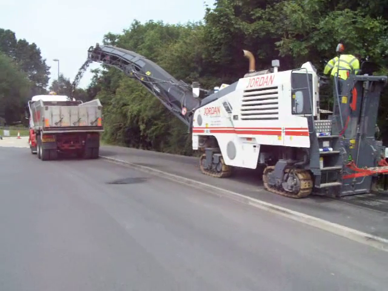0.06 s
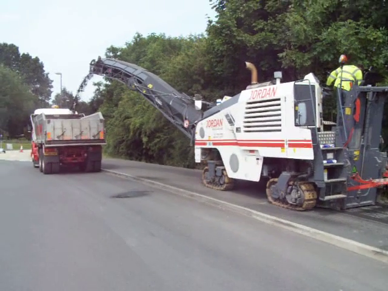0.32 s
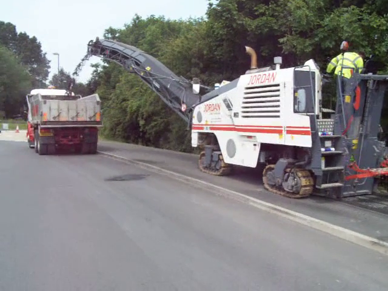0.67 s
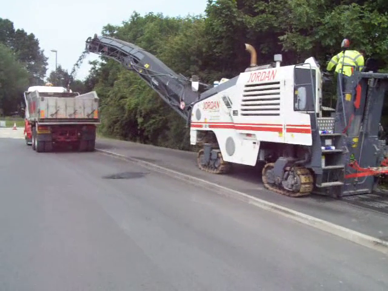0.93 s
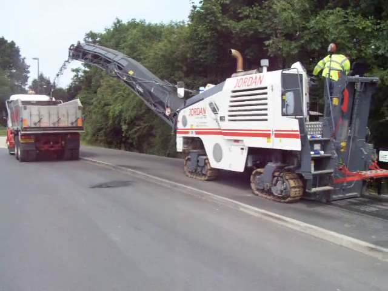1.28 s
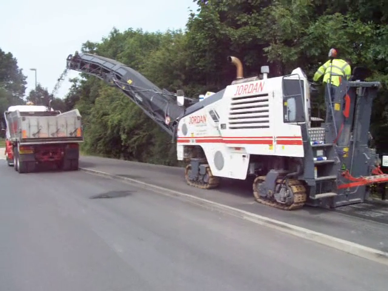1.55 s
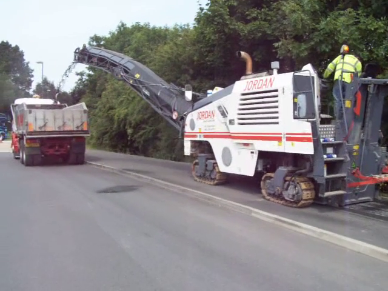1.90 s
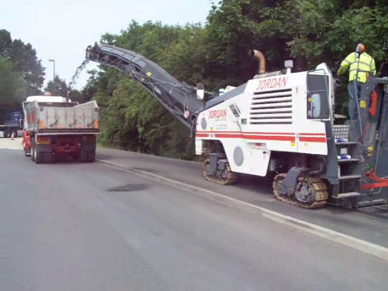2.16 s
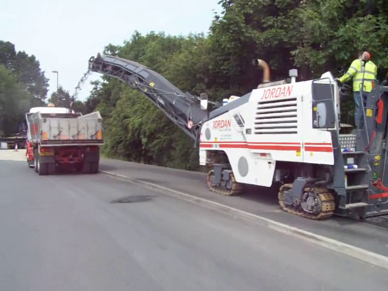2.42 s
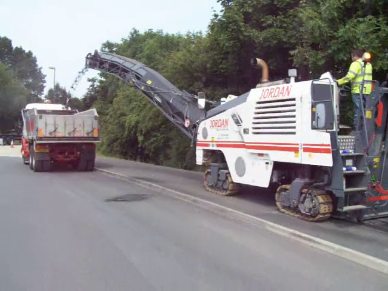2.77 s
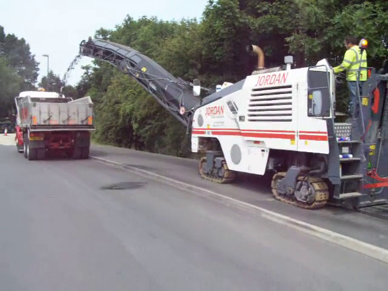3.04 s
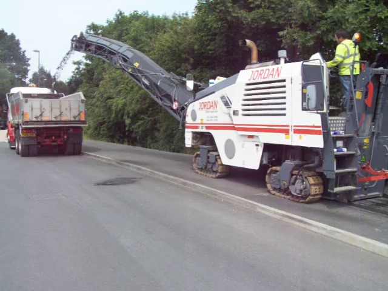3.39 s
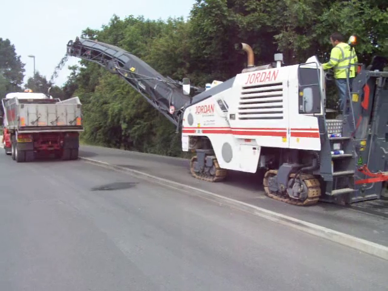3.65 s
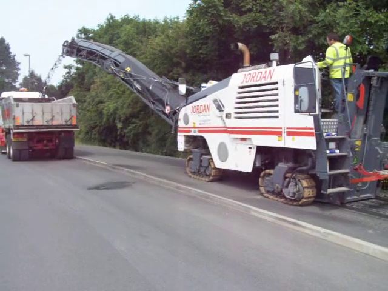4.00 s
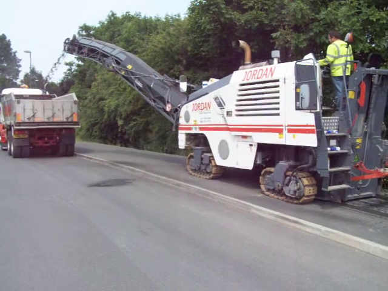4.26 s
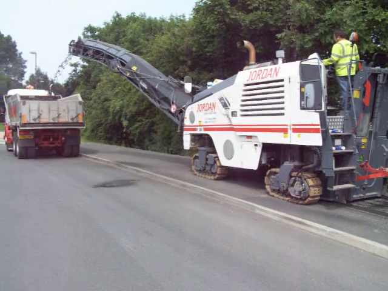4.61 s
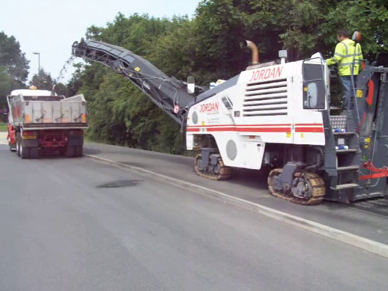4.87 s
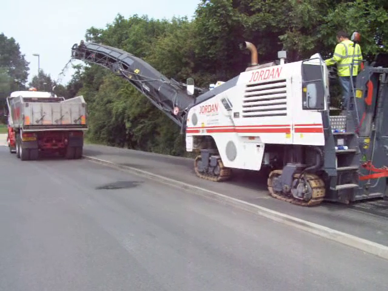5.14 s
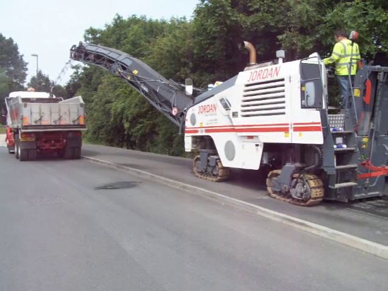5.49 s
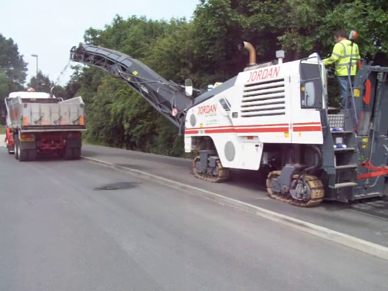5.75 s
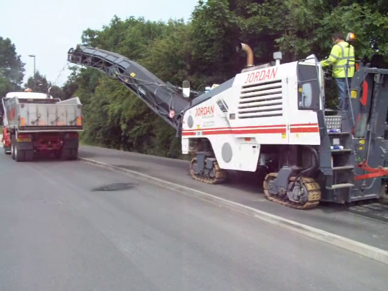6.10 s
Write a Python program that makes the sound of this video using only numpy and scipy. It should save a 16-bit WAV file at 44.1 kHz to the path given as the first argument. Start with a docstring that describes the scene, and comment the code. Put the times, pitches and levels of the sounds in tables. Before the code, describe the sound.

A road planer works about ten metres away in the open air. Its toothed drum bites into asphalt with rapid metallic chatter, pings and brief rough squeals, and a panel booms once. The diesel drone and a gear whine grow with the load as the cut settles into steady crunching, scraping and gritty hiss. Midway the whine turns weaker and rougher, then steadies again.

```python
"""A road planer's toothed drum mills asphalt about ten metres away, in the open air.
Its picks chatter, ping and squeal at first, then settle into steady crunching, scraping and grit hiss.
The six-cylinder diesel drones at governed speed under a gear whine and a pump hum, all growing with
the load. A panel booms once, the frame shudders, and the gears run slack for a spell."""
import sys
import numpy as np
from scipy import signal
from scipy.fft import rfft, irfft
from scipy.io import wavfile
from scipy.ndimage import map_coordinates

SR = 44100
rng = np.random.default_rng(int(sys.argv[2]) if len(sys.argv) > 2 else 0)


def dump(signal):
    """Clip the signal to [-1, 1] and save it as 16-bit WAV at the path in sys.argv[1]."""
    limited = np.clip(np.atleast_2d(signal).T, -1, 1)
    pcm = np.round(limited * 32767).astype(np.int16)
    wavfile.write(sys.argv[1], SR, pcm)


N = 279153
TIME = np.arange(N) / SR
GEAR_TEETH = 24


def undb(db):
    """Decibels to gain."""
    return 10 ** (np.asarray(db) / 20)


def unit(x):
    """Scale to rms 1."""
    return x / np.sqrt(np.mean(x ** 2))


def colour(x, points, skirt_db_per_oct=36):
    """Filter x by (f/Hz, level/dB) points, rolling off outside them; rms 1."""
    hz, db = np.transpose(points)
    octave = np.log2(np.maximum(np.arange(len(x) // 2 + 1) * SR / len(x), 1))
    outside = np.abs(octave - np.clip(octave, np.log2(hz[0]), np.log2(hz[-1])))
    gain = undb(np.interp(octave, np.log2(hz), db) - skirt_db_per_oct * outside)
    return unit(irfft(rfft(x) * gain, len(x)))


def walk(rate_hz):
    """Smooth random wander, spread about 1."""
    knots = rng.standard_normal(4096)
    coarse = map_coordinates(knots, [TIME[::32] * rate_hz + 2], order=3, mode="wrap")
    return np.interp(TIME, TIME[::32], coarse)


def ramp(start_s, length_s):
    """Linear rise from 0 to 1, then held."""
    return np.clip((TIME - start_s) / length_s, 0, 1)


def swell(middle_s, length_s):
    """Half-cosine arch of height 1."""
    return np.cos(np.pi * np.clip((TIME - middle_s) / length_s, -0.5, 0.5))


def add(track, start_s, sound):
    """Mix a short sound into a track."""
    i = max(int(start_s * SR), 0)
    track[i:i + len(sound)] += sound[:N - i]


def load_db(idle_db, full_db, ease_db=0, curve=1.5):
    """Level curve: load builds as the drum sinks in; later the cut eases."""
    load = 1 - (1 - ramp(0, length_s=1.77)) ** curve
    return idle_db + (full_db - idle_db) * load + ease_db * ramp(start_s=3.8, length_s=0.38)


def tones(turns, orders, waver_db, flutter_rad, spread_cycles=1):
    """Shaft-locked wavering tones, rms 1; a small phase spread lines them up into a knock."""
    out = 0
    for order, db in orders:
        phase = 2 * np.pi * (order * turns + spread_cycles * rng.random()) + flutter_rad * walk(9)
        out = out + undb(db + waver_db * walk(6)) * np.sin(phase)
    return unit(out)


def clatter(turns, repeat_share):
    """Noise, part of which repeats every two crank turns."""
    cycle = rng.standard_normal(2400)
    looped = map_coordinates(cycle, [turns / 2 % 1 * len(cycle)], order=3, mode="grid-wrap")
    return np.sqrt(repeat_share) * unit(looped) + np.sqrt(1 - repeat_share) * rng.standard_normal(N)


def stones(rate_hz, scatter_db):
    """Dense impacts of broken asphalt, a few much harder; rms 1."""
    hit = rng.random(N) < rate_hz / SR
    size = undb(scatter_db * np.minimum(rng.exponential(size=N), 5))
    return unit(hit * size * rng.choice([-1, 1], N))


def pick_ring(t, hz, glide, peak_s):
    """A skidding pick: a short ring, falling in pitch."""
    pitch_hz = hz * (1 + glide * (np.exp(-t / 0.0044) - 0.4))
    envelope = t / peak_s * np.exp(1 - t / peak_s)
    return envelope * np.sin(2 * np.pi * (np.cumsum(pitch_hz) / SR + rng.random()))


def hum(turns):
    """Faint crank-locked hum, independent of load."""
    orders = [(2.25, -5), (3, -6.5), (10, 1)]  # crank order, relative level/dB
    return undb(-39.5) * tones(turns, orders, waver_db=2.0, flutter_rad=0.22)


def chassis(start_db=-50.5, full_db=-37, build_s=3.6):
    """Deep frame shudder, building more slowly than the load."""
    # shudder spectrum: f/Hz, relative level/dB
    spectrum = [(20, -17), (35, -2), (58, 1.5), (75, -3.5), (100, -9.5)]
    db = start_db + (full_db - start_db) * ramp(0, build_s)
    return colour(rng.standard_normal(N), spectrum) * undb(db + 1.2 * walk(3.2))


def panel(start_s=0.66, attack_s=0.091, hold_s=0.25, release_s=0.34, rise_hz_per_s=11):
    """A panel booms once as the load builds."""
    envelope = ramp(start_s, attack_s) * (1 - ramp(start_s + attack_s + hold_s, release_s))
    hz = 170.8 + rise_hz_per_s * (TIME - start_s)
    boom = np.sqrt(2) * np.sin(2 * np.pi * np.cumsum(hz) / SR)
    return envelope * undb(-30.5 + 1.3 * walk(12)) * boom


def diesel(turns, throb=0.12, lope=0.059):
    """Exhaust and pump tones over a rumble that throbs each crank turn and lopes each cycle."""
    # exhaust tones: crank order, relative level/dB
    exhaust_orders = [(3, -6), (4, -15.5), (4.5, -11), (5, -5), (6, -2.5), (7, -1), (7.5, -9), (8, -6.5),
                      (9, -8), (10, -12), (12, -17), (18, -12), (20.5, -16.5), (23, -23.5), (30, -11.5)]
    # hydraulic pump tones: crank order, relative level/dB
    pump_orders = [(1.625, -22.5), (3.25, -1.5), (6.5, -2.5)]
    # rumble spectrum: f/Hz, relative level/dB
    rumble_spectrum = [(55, -23), (85, -6), (115, -2.5), (140, -2), (170, -1), (260, 1), (350, -1),
                       (430, -11), (600, -27)]
    exhaust = tones(turns, exhaust_orders, waver_db=1.5, flutter_rad=0.19, spread_cycles=0.37)
    pump = tones(turns, pump_orders, waver_db=-1.0, flutter_rad=0.21)
    beat = 1 + throb * np.cos(2 * np.pi * turns) + lope * np.cos(np.pi * turns)
    rumble = colour(clatter(turns, repeat_share=0.1), rumble_spectrum) * beat
    drone = undb(-2) * exhaust + undb(-9) * pump + undb(-4) * rumble
    return undb(load_db(-33, -22, curve=1.16)) * drone


def gears(turns, tight_rad=0.041, loose_rad=0.91, dip_db=-6.5):
    """Tooth-mesh whine; slack teeth weaken and smear the fundamental and rap harder, brightening it."""
    # mesh overtones: harmonic, level/dB, change with slack/(dB/rad), base flutter/rad
    overtones = [(2, -35, 1, 0.31), (3, -37, 6, 0.27), (4, -40, 11, 0.36)]
    loose = ramp(start_s=1.94, length_s=0.6) * (1 - ramp(start_s=3.79, length_s=0.1))
    slack_rad = tight_rad + (loose_rad - tight_rad) * loose
    whine_db = load_db(-39, -24, ease_db=-0.86, curve=1.4) + dip_db * loose
    waver_db = (0.24 + 1.6 * loose) * walk(12)
    phase = 2 * np.pi * GEAR_TEETH * turns
    out = undb(whine_db + waver_db) * np.sin(phase + slack_rad * walk(45))
    overtone_gain = undb(0.7 * (whine_db - np.median(whine_db)))
    for harmonic, db, db_per_rad, flutter_rad in overtones:
        gain = overtone_gain * undb(db + db_per_rad * slack_rad + 0.51 * walk(25))
        out = out + gain * np.sin(harmonic * phase + flutter_rad * (1 + slack_rad) * walk(50))
    return np.sqrt(2) * out


def dragging():
    """Dragging picks squeal in rough, narrow bands."""
    # squeals: centre t/s, length/s, f/Hz, width/Hz, level/dB
    squeals = [(.332, 0.22, 7130, 35.2, -50), (.75, 0.39, 4140, 400, -30), (1.0, 0.16, 3950, 302, -28.5),
               (1.004, .48, 1720, 150, -31), (1.124, 0.18, 3165, 398, -26), (1.26, .22, 4350, 200, -31)]
    out = 0
    for middle_s, length_s, hz, width_hz, db in squeals:
        phase = 2 * np.pi * hz * TIME
        band = walk(width_hz) * np.cos(phase) + walk(width_hz) * np.sin(phase)
        out = out + undb(db) * swell(middle_s, length_s) * band
    return out


def pings():
    """Single picks catch hard stones and ring."""
    # stone hits: t/s, f/Hz, level/dB
    hits = [(.243, 2300, -16), (.499, 2630, -15), (.6416, 2818, -17), (0.6769, 1760, -15),
            (0.8184, 4110, -14), (0.9563, 3820, -20), (1.0248, 3890, -14)]
    out = np.zeros(N)
    for start_s, hz, db in hits:
        add(out, start_s, undb(db) * pick_ring(TIME[:SR // 20], hz, glide=0.05, peak_s=0.0026))
    return out


def chatter(count=39, gap_s=0.037967, gap_shrink_s=0.0001412, crack_s=0.0016, spacing_s=0.0122):
    """Quickening pick strikes crack and ring; as the drum sinks in, cracks fade first, then rings."""
    # crack spectrum: f/Hz, relative level/dB
    crack_spectrum = [(900, -20), (1700, -5), (2700, 4), (3600, 4), (4300, 3.5), (5200, -4), (6600, -13),
                      (8000, -34), (9000, -44)]
    # pick modes: f/Hz, start level/dB, end level before fade/dB, pitch fall/(Hz/s)
    modes = [(1782, -30, -12.5, 87), (2400, -27, -21.5, 430), (2771, -11.5, -25, 200),
             (3390, -23.5, -22, 220), (4415, -30.5, -20, 400), (6230, -39.5, -33, 550)]
    out = np.zeros(N)
    t = TIME[:SR // 20]
    noise = colour(rng.standard_normal(N), crack_spectrum)
    crack_envelope = t / crack_s * np.exp(1 - t / crack_s)
    for n in range(count):
        start_s = 0.0162 + n * gap_s - gap_shrink_s * n ** 2 / 2
        crack_db = -21.5 - 14 * max(start_s - 0.61, 0)
        buried_db = -21 * max(start_s - 0.97, 0)
        for k, pick_db in enumerate((0, -10, -10)):  # lead pick, two lighter followers
            strike = undb(crack_db) * np.roll(noise, rng.integers(N))[:len(t)] * crack_envelope
            for hz, start_db, end_db, fall_hz_per_s in modes:
                pitch_hz = (hz - fall_hz_per_s * start_s) * (1 + 0.024 * rng.standard_normal())
                db = start_db + (end_db - start_db) * n / count + 2.5 * rng.standard_normal()
                strike = strike + undb(db) * pick_ring(t, pitch_hz, glide=0.078, peak_s=0.002)
            lag_s = k * (spacing_s + 0.00065 * rng.standard_normal())
            add(out, start_s + lag_s, strike * undb(buried_db + pick_db))
    return out


def milling(turns):
    """The drum crunches the road, its picks scrape, and grit hisses up the conveyor."""
    # crunch spectrum: f/Hz, relative level/dB
    crunch_spectrum = [(250, -18.5), (430, -1.5), (520, -0.5), (700, -0.5), (920, 3), (1030, -4),
                       (1300, -2.5), (1550, -2), (1750, 1.5), (1950, -3.5), (2300, -29), (4000, -38)]
    # scrape spectrum: f/Hz, relative level/dB
    scrape_spectrum = [(1000, -34.5), (1800, -8), (2150, -4.5), (2400, 0), (2700, 1), (3100, 1.5),
                       (3500, 0.5), (3750, -4), (4100, -6.5), (4400, -14), (5200, -19.5), (7000, -45)]
    # grit spectrum: f/Hz, relative level/dB
    grit_spectrum = [(2590, -34.5), (4400, 1), (5360, -3), (6140, -3.5), (7080, -6.5), (7840, -15.5),
                     (8800, -32), (11400, -66), (19400, -120)]
    # surges of loose grit: centre t/s, length/s, rise/dB
    surges = [(0.552, 1, 3), (1.34, 0.28, 4.5), (2.45, 0.26, 2)]
    crunch = colour(clatter(turns, repeat_share=0.23), crunch_spectrum)
    crunch *= undb(load_db(-42, -31) + 5.5 + 0.39 * walk(20))
    scrape = colour(stones(rate_hz=7000, scatter_db=2.0), scrape_spectrum)
    scrape *= undb(load_db(-24, -23, ease_db=-1.2) - 1.92 + 0.5 * walk(60))
    surge_db = sum(db * swell(middle_s, length_s) for middle_s, length_s, db in surges)
    hiss = colour(stones(rate_hz=5000, scatter_db=1.0), grit_spectrum)
    hiss *= undb(load_db(-45, -39.5, ease_db=-0.4) + surge_db + 1.5 + 0.91 * walk(7.3))
    return crunch + scrape + hiss


def scene():
    """Machine and cut, mono; one crankshaft times hum, diesel, gears and crunch."""
    # governed speed: t/s, tooth-mesh f/Hz
    speed = [(0.0, 867.6), (0.65, 873.7), (0.85, 872.5), (2.25, 882.3), (2.6, 887), (3.82, 878.8),
             (3.93, 873), (4.7, 877), (6.3, 875.6)]
    mesh_hz = np.interp(TIME, *np.transpose(speed))
    turns = np.cumsum(mesh_hz / GEAR_TEETH) / SR
    machine = hum(turns) + diesel(turns) + gears(turns) + chassis() + panel()
    cutting = milling(turns) + chatter() + pings() + dragging()
    return (machine + cutting)[None]


def record(dry, top_hz=8700):
    """Small mono microphone: steep low-pass."""
    return signal.sosfilt(signal.ellip(8, 0.2, 70, top_hz, fs=SR, output="sos"), dry)


dry = scene()
out = record(dry)
dump(out)
```